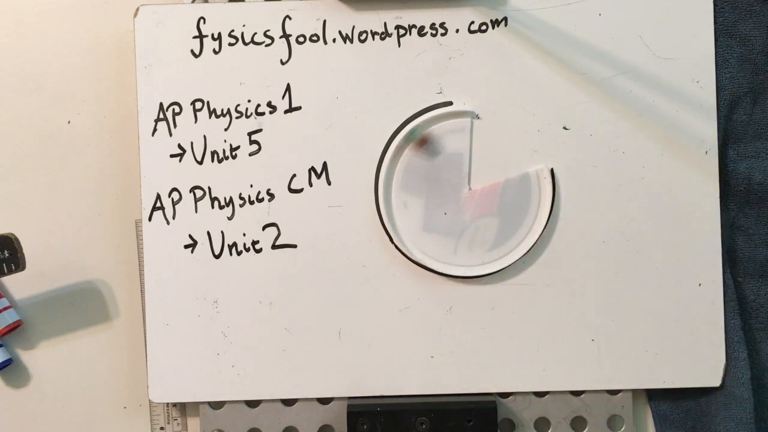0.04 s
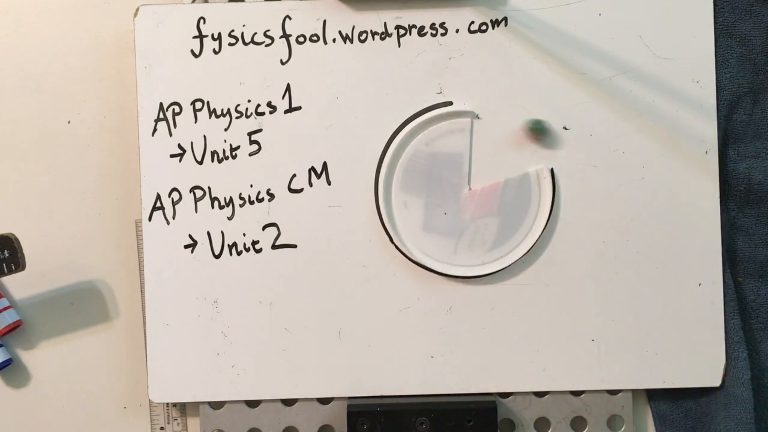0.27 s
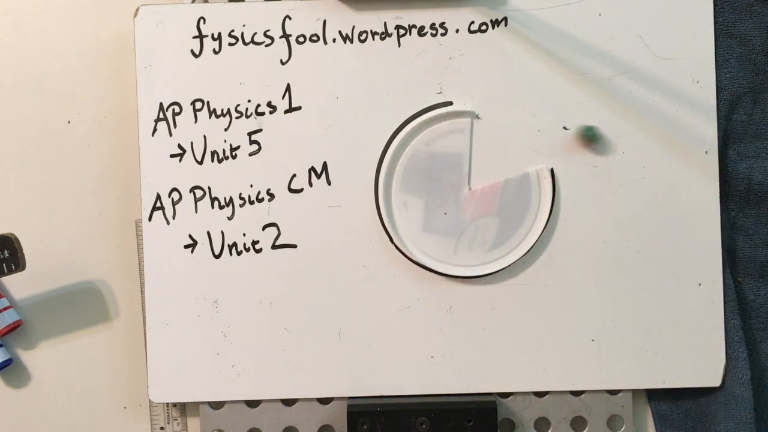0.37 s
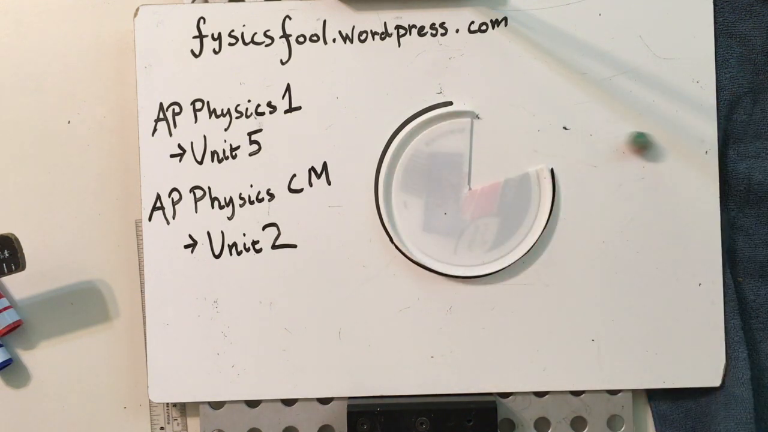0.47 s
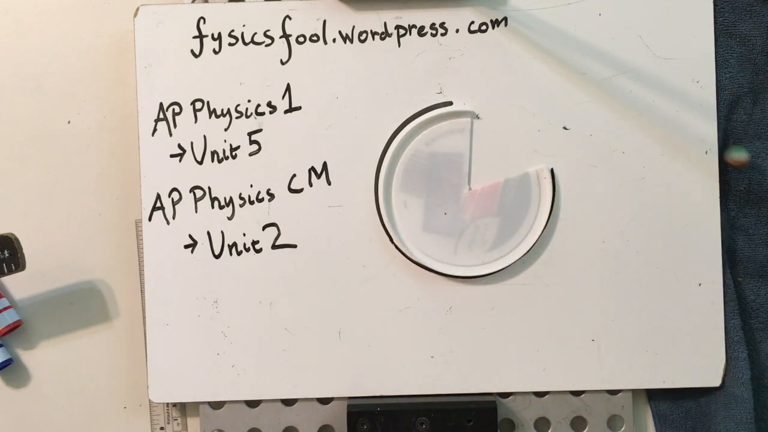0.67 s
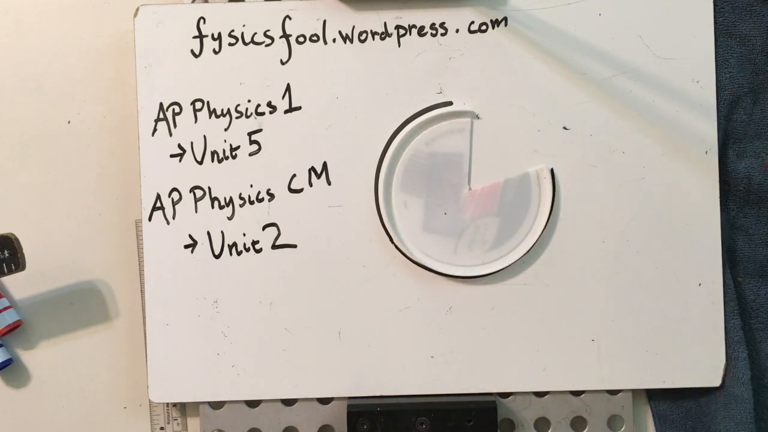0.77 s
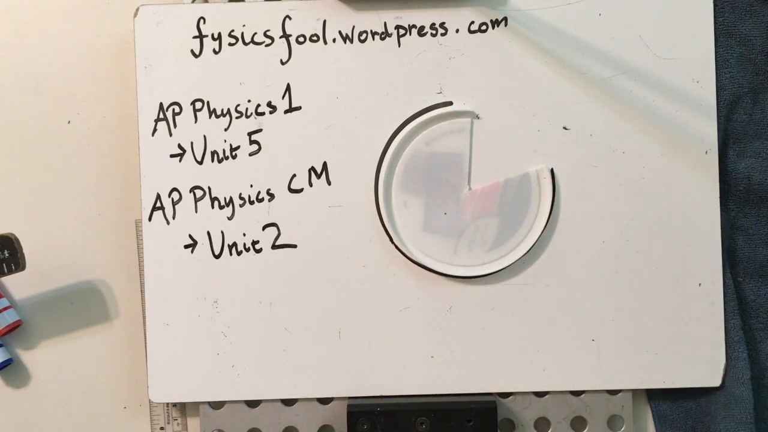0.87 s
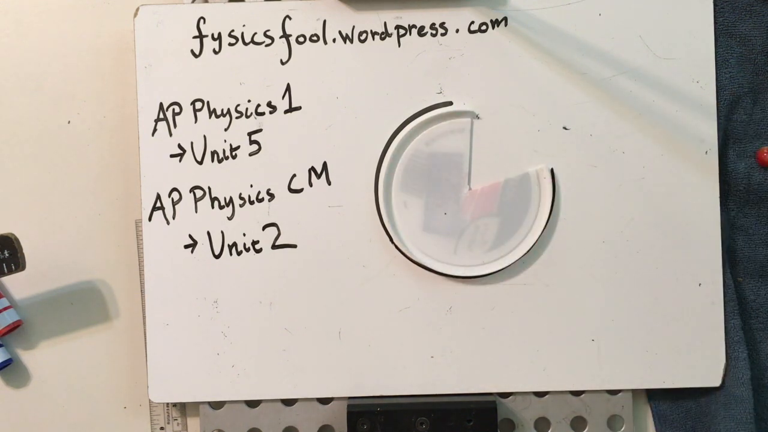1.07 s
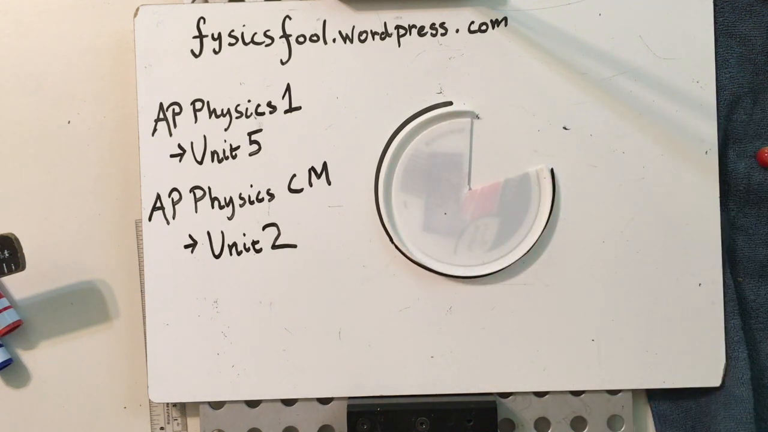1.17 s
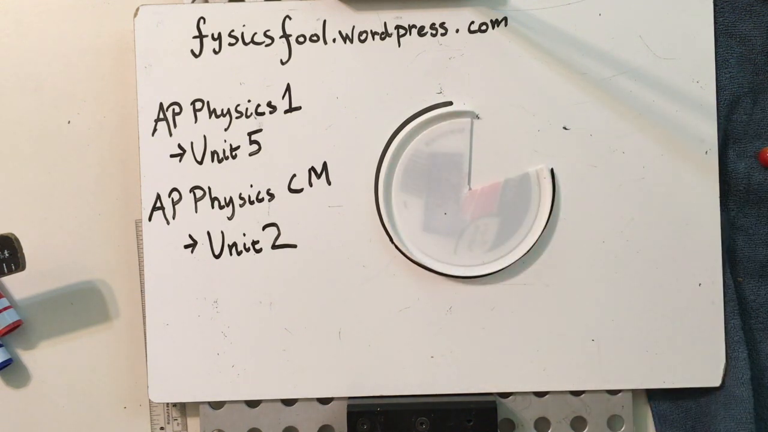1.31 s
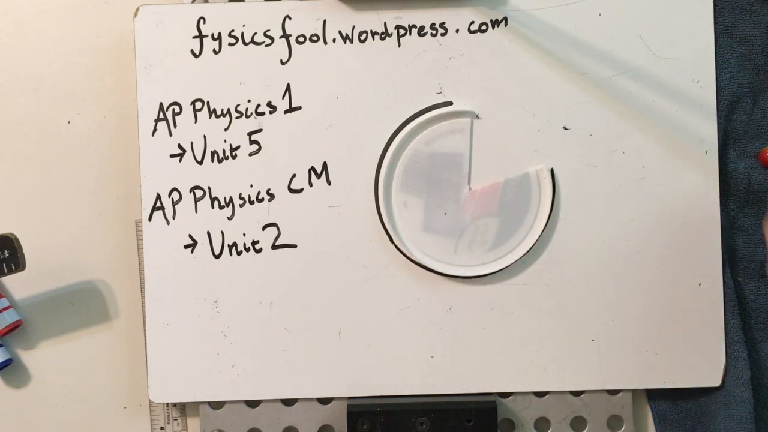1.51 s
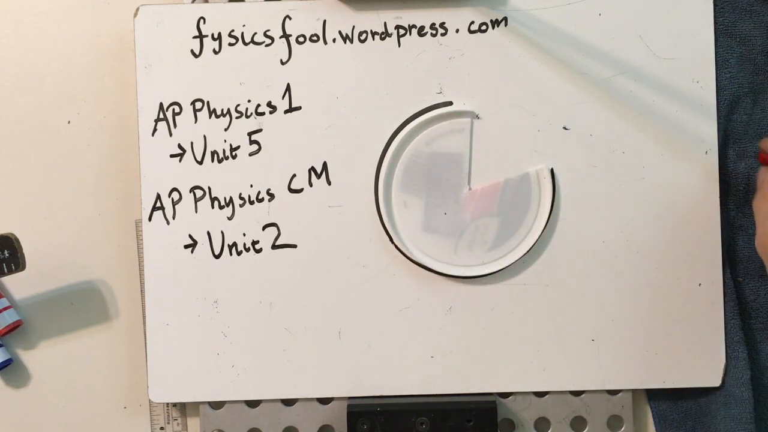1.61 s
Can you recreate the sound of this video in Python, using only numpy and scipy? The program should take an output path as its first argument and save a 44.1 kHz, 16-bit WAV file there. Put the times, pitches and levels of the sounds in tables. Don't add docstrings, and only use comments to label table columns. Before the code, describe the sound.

A glass marble rattles round a thin plastic lid, with faint scraping and rapid light clicks from 0.05 to 0.18 seconds. At 0.24 it drops onto a board with a loud crack and one soft bounce, then rolls with a hollow, uneven, bumpy rattle until 0.7, ending abruptly. Short room reverberation, low ventilation hum and soft hiss remain; a tiny bright double tick comes at 1.65.

```python
import sys
import numpy as np
from scipy import signal
from scipy.fft import rfft, irfft
from scipy.io import wavfile
from scipy.ndimage import uniform_filter1d

SR = 44100
rng = np.random.default_rng(int(sys.argv[2]) if len(sys.argv) > 2 else 0)


def ratio_of_db(decibels):
    return 10 ** (np.asarray(decibels, float) / 20)


def log_audio(samples):
    frames = np.atleast_2d(samples).T
    limited = np.clip(frames, -1, 1)
    pcm = np.round(limited * 32767).astype(np.int16)
    wavfile.write(sys.argv[1], SR, pcm)


N = 72765
T = np.arange(N) / SR

# [f/Hz, level/dB per Hz]
RUMBLE_SPECTRUM = [(26, -31.5), (45, 0), (75, -11.5), (114, -5.5), (156, -19), (205, -12), (306, -39),
                   (394, -29), (700, -43), (910, -70.5), (1540, -120)]
# [f/Hz, level/dB per Hz]
HISS_SPECTRUM = [(410, -42.5), (700, -2.5), (1030, 2), (1140, -2.5), (3240, -5.5), (5020, -8.5),
                 (15000, -3), (15900, -9.5), (16500, -30.5)]
RUMBLE_DB, HISS_DB = -58.5, -77.5
FAN_HZ, FAN_WIDTH_HZ, FAN_DB = 194.4, 11, -72

# [t/s, peak level/dB]
RIM_CLICKS = [(.0476, -41.5), (.0662, -35.5), (.0768, -30), (.0845, -43), (.0900, -42.5), (.1020, -52),
              (.1058, -49), (.1094, -34.5), (.1232, -47.5), (.1298, -42), (.1462, -42), (.1500, -45),
              (.1728, -45), (.1798, -46)]
# [t/s, level/dB]
RIM_SCRAPE = [(0, -53.5), (.03, -58.5), (.06, -58), (.09, -59), (.12, -57.5), (.15, -58), (.19, -66),
              (.235, -67)]
# [f/Hz, t60/s, click level/dB, scrape level/dB, moment of a crest t/s]
LID_MODES = [(537, 0.031, -9, -0.5, 0.084), (690, 0.034, -20.5, 0, 0.013), (1080, .02, -19.5, -2.5, 0.27),
             (1680, 0.027, -19, -7, .03), (2550, 0.015, -16.5, 4, 0.035), (2926, 0.0091, -6.5, 6, 0.0073),
             (3180, 0.014, -0.5, 5, 0.082), (3870, .008, -13.5, -6.5, 0.044)]
# [f/Hz, level/dB]
LID_TOP = [(1300, -14), (3900, -1), (6000, -2), (7600, -14), (8800, 1.5), (10200, -7), (12000, 2.5),
           (16000, -17.5)]
LID_TOP_T60_S, LID_TOP_CLICK_DB, LID_TOP_SCRAPE_DB = .007, 13.5, 13
RIM_GRIT_PER_S, RIM_SPREAD_DB, RIM_CONTACT_MS = 2500, 2, .042
LID_CREST_DB, LID_CREST_EVERY_S = 4.5, .062
SOUND_LATE_S, LID_LOW_HZ = .0001, 324

ROOM_T60_S, ROOM_TREBLE_T60_S, ROOM_DB, ROOM_GAP_S = .27, .3, -9.5, 0.0056

# [t/s, peak level/dB, contact/ms]
BLOWS = [
    (0.2372, -14, .1),
    (.2487, -29, .25),
]
# [t/s, peak level/dB]
BUMPS = [(.364, -41), (.368, -38), (.408, -36), (.432, -36), (.447, -34), (.465, -52), (.502, -48),
         (.5571, -45), (.610, -31), (.633, -81), (.650, -35), (.678, -42.5), (.698, -41)]
# [t/s, level/dB]
BOARD_ROLL = [(.25, -42), (.3, -46), (.35, -46), (0.369, -42.5), (.42, -48.5), (.46, -45), (.53, -50.5),
              (.62, -47), (.7, -49)]
# [f/Hz, t60/s, blow level/dB, roll level/dB, crest place along the path/0-1]
BOARD_MODES = [(462, .04, -16.5, -13.5, 0.92), (551.5, 0.041, -11.5, 0, 0.29),
               (650, 0.044, -6.5, 7.5, 0.27), (713, .03, 5, 3.5, 0.4), (785, 0.022, -4, 2, .2),
               (899, 0.051, -23, -8.5, 0), (1167, 0.039, 0.5, -7, .5), (1276, 0.039, -8, -5.5, 0.74),
               (1427, 0.038, -2.5, -2, 0.69), (1620, 0.033, -3.5, -4.5, 0.8), (2402, 0.011, -15, -13, 0.9),
               (2623, .035, 1.5, -17, 0.1), (3020, 0.019, -10, -11, .86), (3549, 0.015, -24.5, -19, 0.6)]
# [f/Hz, level/dB]
BLOW_TOP = [(1700, -10.5), (2200, -3), (3200, 2.5), (4500, -14), (7000, -9), (10000, -17), (12500, -7.5),
            (16000, -24)]
# [f/Hz, level/dB]
ROLL_TOP = [(900, 7), (1900, 1.5), (3000, -3), (4300, -18.5), (6000, -22), (9000, -27.5), (12500, -22.5),
            (16000, -43.5)]
# [f/Hz, t60/s, blow level/dB, roll level/dB]
TABLE_MODES = [(172, .12, -20, -22.5), (313.6, 0.044, -25.5, -15)]
BLOW_TOP_T60_S, BLOW_TOP_DB, ROLL_TOP_T60_S, ROLL_TOP_DB = 0.018, 18.5, 0.008, 13.5
CREST_DB, CRESTS_AT_1KHZ = 9, 1.1
LEAVES_S, LEAVE_FADE_S = .707, 0.0016
GRIT_PER_S, GRIT_SPREAD_DB, LUMPY_DB = 5000, 2, 1.16
BUMP_DB, BUMP_CONTACT_MS, CRACK_MS = -9.5, 0.083, .032
ROLL_CONTACT_HZ, BOARD_LOW_HZ = 6140, 400
BASS_LATE_MS_AT_1KHZ = .3
TWIN_SHARE, TWIN_LATE_S = .035, 0.003999

# [t/s, peak level/dB]
TICKS = [
    (1.6464, -56.5),
    (1.649, -63),
]
# [f/Hz, t60/s, level/dB]
TICK_MODES = [(5700, 0.0048, -7), (11700, 0.0034, 6), (12830, .003, 2)]

TOP_HZ = 15850


def level(x, db):
    return x * ratio_of_db(db) / np.sqrt(np.mean(x ** 2))


def walk(rate):
    k = int(SR / rate)
    smooth = uniform_filter1d(rng.standard_normal(N), k)
    return level(uniform_filter1d(smooth, k), 0)


def coloured(points, db):
    f = np.fft.rfftfreq(N, 1 / SR) + 1
    hz, shape_db = np.array(points).T
    gain = ratio_of_db(np.interp(np.log(f), np.log(hz), shape_db, -90, -90))
    return level(irfft(rfft(rng.standard_normal(N)) * gain, N), db)


def mode(x, hz, t60):
    pole = np.exp(2j * np.pi * hz / SR - np.log(1000) / (max(t60, 1e-3) * SR))
    return signal.lfilter([1], [1, -pole], x).imag


def dense(x, points, t60):
    burst = coloured(points, 0)[:4096] * ratio_of_db(-60 * T[:4096] / t60)
    return signal.fftconvolve(x, burst / np.sqrt(np.sum(burst ** 2)))[:N]


def taps(rows, ms=.04):
    x = np.zeros(N)
    for row in rows:
        contact_ms = row[2] if len(row) > 2 else ms
        width = max(contact_ms, .02) / 4000
        at = slice(int(row[0] * SR) - 64, int(row[0] * SR) + 64)
        push = np.exp(-.5 * ((T[at] - row[0]) / width) ** 2)
        x[at] += ratio_of_db(row[1]) * push / (width * SR * np.sqrt(2 * np.pi))
    return x


def grit(per_s, spread_db, curve):
    hit, size, sign = rng.random((3, N))
    strike = np.clip((per_s / SR - hit) * 86000.0, 0, 1)
    x = strike * ratio_of_db(-spread_db * np.log(size + 1e-4)) * np.sign(sign - .5)
    return level(x, 0) * ratio_of_db(np.interp(T, *np.array(curve).T))


def late(x, s):
    return np.interp(T - s, T, x, 0, 0)


def thin(x, hz):
    return signal.sosfilt(signal.butter(3, hz, "high", fs=SR, output="sos"), x)


def air():
    fan = mode(rng.standard_normal(N), FAN_HZ, np.log(1000) / np.pi / FAN_WIDTH_HZ)
    rumble = coloured(RUMBLE_SPECTRUM, RUMBLE_DB) * ratio_of_db(1.1 * walk(5))
    return rumble + level(fan, FAN_DB) + coloured(HISS_SPECTRUM, HISS_DB)


def lid():
    clicks = taps([(s + SOUND_LATE_S, db) for s, db in RIM_CLICKS], ms=RIM_CONTACT_MS) * ratio_of_db(-6.5)
    scrape = grit(RIM_GRIT_PER_S, RIM_SPREAD_DB, list(RIM_SCRAPE) + [(.24, -120)]) * ratio_of_db(-23)
    top_push = ratio_of_db(LID_TOP_CLICK_DB) * clicks + ratio_of_db(LID_TOP_SCRAPE_DB) * scrape
    out = dense(top_push, LID_TOP, LID_TOP_T60_S)
    for k, (hz, t60, click_db, scrape_db, crest_s) in enumerate(LID_MODES):
        off_crest = np.sin(np.pi * (T - crest_s) / LID_CREST_EVERY_S) ** 2
        push = ratio_of_db(click_db) * clicks + ratio_of_db(scrape_db - LID_CREST_DB * off_crest) * scrape
        out = out + (-1) ** k * mode(push, hz, t60)
    return thin(out, LID_LOW_HZ)


def room(x):
    t = T[:SR // 2]
    noise = rng.standard_normal(len(t))
    low = signal.sosfilt(signal.butter(2, 3000, fs=SR, output="sos"), noise)
    tail = low * ratio_of_db(-60 * t / ROOM_T60_S) + (noise - low) * ratio_of_db(-60 * t / ROOM_TREBLE_T60_S)
    tail = tail * (1 - np.exp(-(t / ROOM_GAP_S) ** 2))
    return signal.fftconvolve(x, tail / np.sqrt(np.sum(tail ** 2)))[:N] * ratio_of_db(ROOM_DB)


def rolling(start):
    leaving = np.exp(np.clip((T - LEAVES_S) / LEAVE_FADE_S * 4, -50, 50))
    on_board = (T > start) / (1 + leaving)
    roll = grit(GRIT_PER_S, GRIT_SPREAD_DB, BOARD_ROLL) * on_board * ratio_of_db(-22 + LUMPY_DB * walk(40))
    roll = signal.lfilter(*signal.butter(2, ROLL_CONTACT_HZ, fs=SR), roll)
    return roll + taps(BUMPS, ms=BUMP_CONTACT_MS) * ratio_of_db(BUMP_DB)


def board():
    start = BLOWS[0][0]
    roll = rolling(start)
    blow = taps(BLOWS) * ratio_of_db(-11)
    crack = taps([row[:2] for row in BLOWS], ms=CRACK_MS) * ratio_of_db(-5.5)
    out = ratio_of_db(BLOW_TOP_DB) * dense(crack, BLOW_TOP, BLOW_TOP_T60_S)
    out = out + ratio_of_db(ROLL_TOP_DB) * dense(roll, ROLL_TOP, ROLL_TOP_T60_S)
    place = (T - start) / (LEAVES_S - start)
    for k, (hz, t60, blow_db, roll_db, crest) in enumerate(BOARD_MODES):
        crests = CRESTS_AT_1KHZ * (hz / 1000) ** 0.059
        off_crest = np.sin(np.pi * crests * (place - crest)) ** 2
        push = ratio_of_db(roll_db - CREST_DB * off_crest) * roll
        hit = late(ratio_of_db(blow_db) * blow, BASS_LATE_MS_AT_1KHZ / hz)
        twin = .7 * mode(late(push, TWIN_LATE_S), hz * (1 + TWIN_SHARE), t60)
        out = out + mode(hit, hz, t60) + (-1) ** k * (mode(push, hz, t60) + twin)
    out = thin(out, BOARD_LOW_HZ)
    for hz, t60, blow_db, roll_db in TABLE_MODES:
        out = out + mode(ratio_of_db(blow_db) * blow + ratio_of_db(roll_db) * roll, hz, t60)
    return out


def tick():
    touch = taps(TICKS)
    return sum(ratio_of_db(db + 1) * mode(touch, hz, t60) for hz, t60, db in TICK_MODES)


def scene():
    near = lid() + board() + tick()
    return (near + room(near) + air())[None]


def low_pass(x):
    return signal.sosfilt(signal.butter(12, 16650, fs=SR, output="sos"), x)


def record(dry):
    mix = signal.sosfilt(signal.butter(14, TOP_HZ, fs=SR, output="sos"), dry)
    return low_pass(mix)


dry = scene()
out = record(dry)
log_audio(out)
```